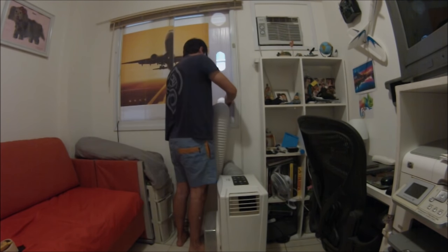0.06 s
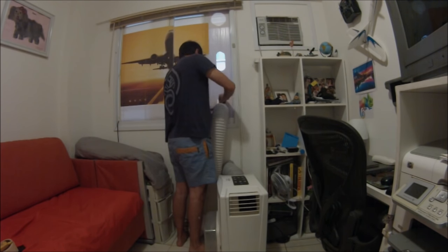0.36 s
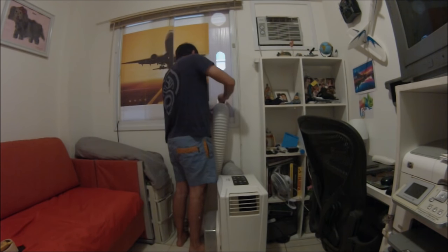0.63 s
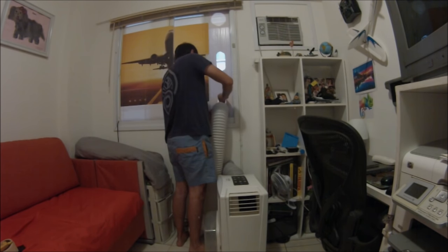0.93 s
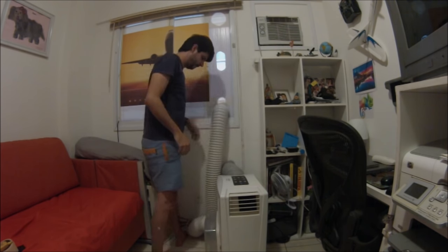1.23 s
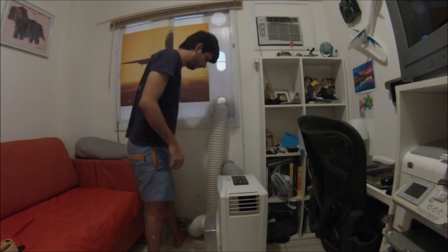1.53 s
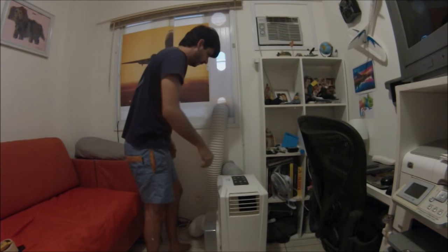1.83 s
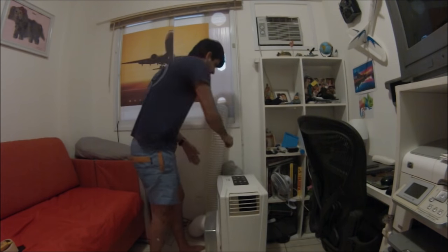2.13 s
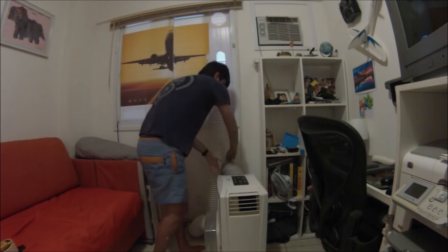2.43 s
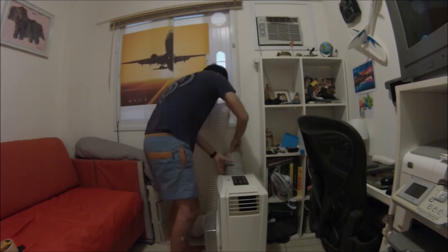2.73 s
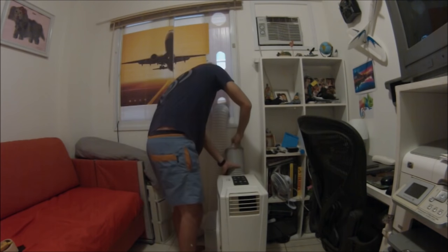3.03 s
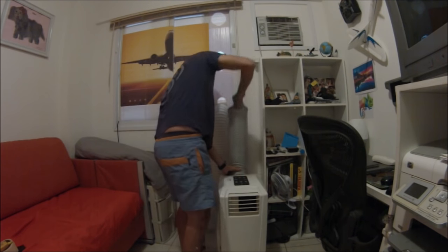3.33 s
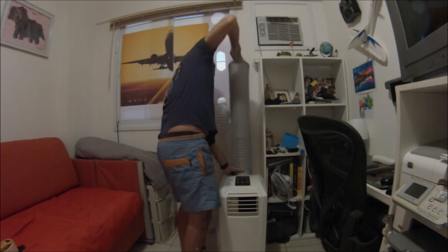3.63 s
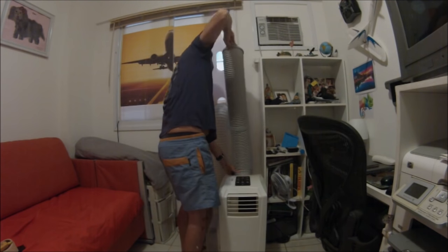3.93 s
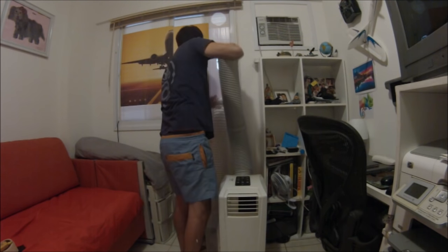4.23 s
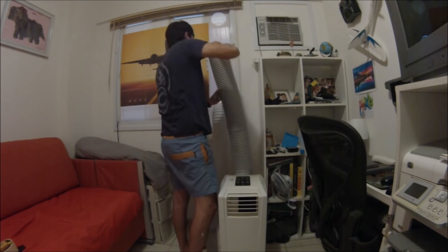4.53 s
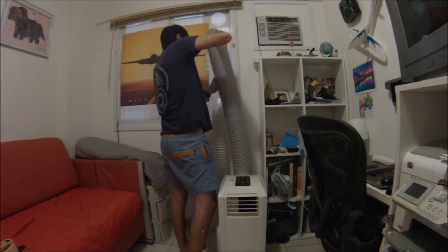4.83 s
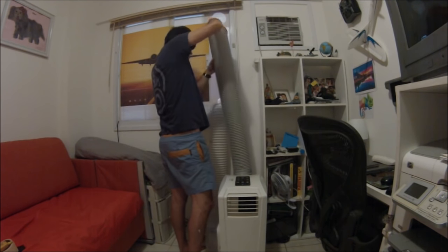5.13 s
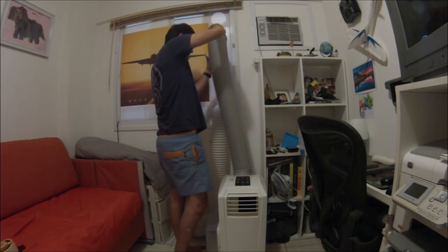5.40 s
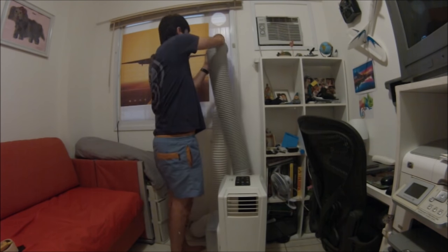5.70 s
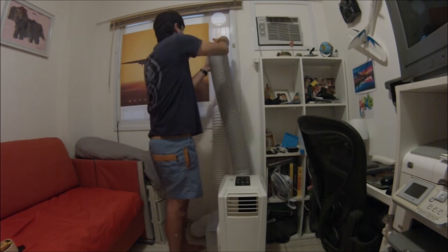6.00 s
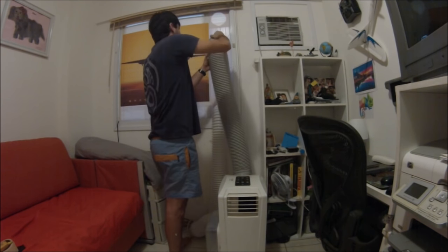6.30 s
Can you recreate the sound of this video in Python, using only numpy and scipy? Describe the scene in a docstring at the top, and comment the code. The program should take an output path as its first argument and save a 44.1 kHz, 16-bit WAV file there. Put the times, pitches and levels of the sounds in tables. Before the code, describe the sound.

A ribbed plastic air duct is handled in a small, boomy room, heard from a few metres away over a steady low hush. During the first second, fingers faintly rub the ribs and the hard collar knocks lightly as it comes off a window panel. Little but the hush follows until about 2.5 seconds, when the duct is squeezed together, crinkling and flexing on one hollow note. From 3.1 to 3.9 seconds comes the loudest part: the duct is stretched, its pleats buckling in dense snaps with sharp pops that grow deeper, until the last ribs go taut. Faint rubbing follows around 4.3 seconds. From 4.6 seconds the collar knocks and scrapes on the panel, with a firmer knock at 5.1. More knocks lead to a short, loud shove at 5.6 and a couple of thumps. Faint finger rubs close it around 6 to 6.4 seconds.

```python
"""Fingers rub a ribbed plastic air duct, and its hard collar knocks as it comes off a window panel.
The duct is gathered up, flexing on one hollow note, then stretched: its pleats buckle in dense
runs of snaps with a few loud pops, until the last ribs go taut. The collar then knocks and scrapes
on the panel and is shoved home. Throughout, a small, boomy room answers every sound, heard from
a few metres away over a steady hush."""
import sys
import numpy as np
from scipy import signal
from scipy.fft import rfft, irfft
from scipy.io import wavfile
from scipy.ndimage import uniform_filter1d

SR = 44100
rng = np.random.default_rng(int(sys.argv[2]) if len(sys.argv) > 2 else 0)


def put_to_file(sound):
    """Save the sound as 16-bit audio at rate SR, in the file named by the first command-line argument."""
    columns = np.atleast_2d(sound).T  # one column per channel
    safe = np.clip(columns, -1, 1)
    whole_steps = np.round(safe * 32767)
    wavfile.write(sys.argv[1], SR, whole_steps.astype(np.int16))


N = 284886
BINS_HZ = np.fft.rfftfreq(4096, 1 / SR)


def amp(db):
    """Decibels to amplitude ratio."""
    return 10 ** (np.asarray(db) / 20)


def unit(x):
    """Normalisation to energy 1."""
    return x / np.sqrt(np.sum(x ** 2) + 1e-20)


def read(points, hz):
    """Interpolation on a logarithmic frequency axis."""
    f, value = np.transpose(points)
    return np.interp(np.log(hz + 1), np.log(f + 1), value)


def add(mix, start_s, sound):
    """Superposition: a sound adds to the mix from its start."""
    part = mix[max(round(start_s * SR), 0):][:len(sound)]
    part += sound[:len(part)]


def click(spectrum_db):
    """Minimum phase: the sharpest causal pulse with this spectrum, energy 1."""
    log_gain = np.log(amp(np.maximum(spectrum_db, spectrum_db.max() - 100)))
    mirrored = np.r_[log_gain, log_gain[-2:0:-1]]
    response = np.exp(np.conj(signal.hilbert(mirrored)))
    return unit(irfft(response[:len(log_gain)]))


def whiten(x, width_hz):
    """Inverse filtering evens out a burst's broad spectrum and keeps its fine ripple, energy 1."""
    power = abs(rfft(x, 2 ** 16)) ** 2
    hz = np.fft.rfftfreq(2 ** 16, 1 / SR)
    smooth = uniform_filter1d(power, max(int(width_hz / hz[1]), 1))
    inverse = click(-10 * np.log10(np.interp(BINS_HZ, hz, abs(smooth)) + 1e-9))
    return unit(signal.oaconvolve(x, inverse)[:len(x)])


def snaps(count, per_s, spread_db):
    """A Poisson train of tiny buckles of uneven size, mean power 1."""
    size = amp(spread_db * np.clip(rng.standard_normal(count), -2, 2))
    sign = rng.choice([-1, 1], count)
    occurs = rng.random(count) < per_s / SR
    return unit(size * sign * occurs) * np.sqrt(count)


def clumps(t, per_s, depth_db):
    """Random amplitude modulation: ribs stick and give in small groups."""
    knots = np.arange(t[0], t[-1] + 1, 1 / per_s)
    gain = amp(depth_db * np.interp(t, knots, rng.uniform(-0.89, 1, len(knots))))
    return unit(gain) * np.sqrt(len(t))


def stroke(rows, spectrum, attack_s, release_s, swell_db_per_s, per_s, spread_db):
    """Impulse excitation: as ribs slip and buckle, each snap shakes the body and cracks in the film."""
    split_hz, depth_db = 2000, 26
    treble_ratio = (BINS_HZ / split_hz) ** 4 + 1e-12
    spectrum_db = read(spectrum, BINS_HZ)
    body_snap = click(spectrum_db - 10 * np.log10(1 + treble_ratio))
    film_snap = click(spectrum_db - 10 * np.log10(1 + 1 / treble_ratio))
    out = np.zeros(N)
    for start, length, body_db, film_db in rows:
        t = np.arange(0, length + release_s, 1 / SR)
        slack = np.maximum(1 - t / attack_s, 0) + np.maximum(t - length, 0) / release_s
        grip = amp(-depth_db * slack)
        train = snaps(len(t), per_s, spread_db) * clumps(t, per_s=69.5, depth_db=5) * grip
        add(out, start, signal.oaconvolve(train * amp(body_db + swell_db_per_s * t), body_snap))
        add(out, start, signal.oaconvolve(train * amp(film_db), film_snap))
    return out


def blows(rows, spectrum, bass_hz, treble_hz, ring_octaves, crack, crack_s, per_s):
    """Resonance: a chatter of ribs rings in the hollow of the duct; quick blows open with a crack."""
    out, hz, t = np.zeros(N), BINS_HZ + 1, np.arange(SR // 10) / SR
    for start, db, bass_db, treble_db, ring_hz, ring_db, scatter_s in rows:
        age = t / scatter_s
        drive = unit(snaps(len(t), per_s, spread_db=1) * np.sqrt(age) * np.exp(-age))
        drive[0] += crack * np.exp(-scatter_s / crack_s)
        shape_db = read(spectrum, hz) + bass_db / (1 + (hz / bass_hz) ** 4)
        shape_db += treble_db / (1 + (treble_hz / hz) ** 2)
        shape_db += ring_db * np.exp(-.5 * (np.log2(hz / ring_hz) / ring_octaves) ** 2)
        blow = unit(signal.oaconvolve(whiten(drive, width_hz=284), click(shape_db)))
        add(out, start, amp(db) * np.sqrt(SR / 50) * blow)  # level counts over 1/50 s
    return out


# The room's background. Each row: frequency in Hz, relative level in dB.
HUSH_SPECTRUM = [(12, -39.5), (20, -3.5), (49, -3), (119, -1), (171, -6.5), (238, -3), (352, -6),
                 (382, -8.5), (439, -6), (478, -7.5), (686, -9), (906, -12.5), (1160, -13.5), (2840, -18.5),
                 (15500, -39)]

def hush(level_db=-56):
    """Stationary noise, strongest in the bass, fills the room."""
    gain = amp(read(HUSH_SPECTRUM, np.fft.rfftfreq(N, 1 / SR)))
    noise = irfft(rfft(rng.standard_normal(N)) * gain, N)
    return amp(level_db) * unit(noise) * np.sqrt(N)


# Finger strokes. Each row: start and length in seconds, body and film levels in dB.
RUB_STROKES = [(0, 0.0121, -40.5, -46.5), (.09, 0.053, -52, -51.5), (.15, 0.048, -52, -56.5),
               (.66, 0.15, -52.5, -58), (.755, .05, -44, -44), (.8, 0.055, -38.5, -46),
               (1.42, 0.0336, -53.5, -60), (2.85, 0.203, -62, -59), (4.26, 0.319, -54, -58),
               (4.4, 0.04, -45, -47), (5.88, .27, -58, -60.5), (6.32, 0.13, -55.5, -57)]
# Their spectrum. Each row: frequency in Hz, relative level in dB.
RUB_SPECTRUM = [(30, -9), (60, -3), (110, -13), (200, -7), (350, -6), (800, -12.5), (1600, -9), (4000, -23),
                (7000, -34.5), (15500, -60)]

def rubbing():
    """Light friction: fingers slip over the ribs."""
    return stroke(RUB_STROKES, RUB_SPECTRUM, attack_s=0.01476, release_s=0.089,
                  swell_db_per_s=2.5, per_s=1100, spread_db=1.5)


# Collar impacts. Each row: start in seconds, level, bass and treble in dB, ring in Hz,
# scatter time in seconds.
COLLAR_KNOCKS = [(.1, -49.5, -17, -10, 2200, .006), (.224, -43.5, -5, -15, 573, 0.0034),
                 (.759, -41, -9, -13, 500, 0.0045), (.816, -34, -12, -19, 420, 0.0068),
                 (4.64, -33, 6, 0, 306, 0.0036), (4.653, -39, 2, -9, 575, 0.0047),
                 (4.731, -34.5, 6.5, -8.5, 293, 0.0035), (5.089, -24, 12.5, -4, 1490, 0.0063),
                 (5.425, -34.5, 10.5, 3.5, 442, 0.0023), (5.482, -34, -4, -3.5, 4400, .004),
                 (5.633, -27.5, 4, 12, 1226, 0.0033), (5.692, -24.5, 9, -6, 168, 0.0022),
                 (5.82, -32, 17, 7, 200, 0.00447)]
# Their spectrum. Each row: frequency in Hz, relative level in dB.
KNOCK_SPECTRUM = [(35, -33), (90, -9), (300, -4), (700, -6.5), (1500, -10.5), (3500, -14.5), (7000, -20),
                  (11000, -27), (15500, -38)]

def knocking(ring_db=8):
    """Impact: the hard collar strikes the panel, ringing differently at each place."""
    rows = [(*knock, ring_db, scatter_s) for *knock, scatter_s in COLLAR_KNOCKS]
    return blows(rows, KNOCK_SPECTRUM, bass_hz=190, treble_hz=2500, ring_octaves=0.4,
                 crack=2.1, crack_s=0.00067, per_s=5000)


# The squeeze. Each row: start and length in seconds, body and film levels in dB.
GATHER_STROKES = [(2.555, 0.24, -30, -36)]
# Its spectrum. Each row: frequency in Hz, relative level in dB.
GATHER_SPECTRUM = [(24, -70.5), (40, -30.5), (129, -2.5), (162, -6), (325, 3.5), (438, -5.5), (509, 0.5),
                   (621, -22), (670, -8.5), (1220, -5.5), (3140, -17.5), (8730, -34), (15500, -43.5)]

def gathering():
    """Compression: the ribs buckle as they are pushed together."""
    return stroke(GATHER_STROKES, GATHER_SPECTRUM, attack_s=0.14, release_s=0.19,
                  swell_db_per_s=-7.5, per_s=820, spread_db=2.5)


# Flexes of the bunched duct. Each row: start in seconds, level and treble in dB.
DUCT_FLEXES = [(2.631, -40, -6.5), (2.684, -30.5, -9), (2.750, -29, -13.5), (2.784, -33, 3.5),
               (3.047, -26.5, -10.5), (3.073, -29, -15.5), (3.102, -22.5, -16)]
# Pleats flipping. Each row: start in seconds, level and treble in dB, ring in Hz,
# scatter time in seconds.
PLEAT_POPS = [(3.121, -20, 4.5, 990, 0.00135), (3.161, -14.5, 10, 3850, 0.0012),
              (3.169, -14.5, 1, 840, .0036), (3.232, -14, -6, 3270, 0.0033),
              (3.235, -12.5, -5, 296.3, 0.0045), (3.294, -17, -37, 246, 0.0045),
              (3.311, -15.5, 5.5, 1030, 0.00376), (3.374, -14, -8.5, 1430, 0.00486),
              (3.391, -16, -18, 240, .0056), (3.442, -18, -1.5, 555, .003),
              (3.478, -17.5, -8.5, 60, 0.0101), (3.522, -16.5, -10.5, 880, 0.0074),
              (3.553, -15.5, -26, 540, 0.0055), (3.755, -20.5, -16, 1594, 0.007)]
# The spectrum of both. Each row: frequency in Hz, relative level in dB.
PLEAT_SPECTRUM = [(35, -16), (90, -5.5), (250, 3), (600, -2), (1300, -3), (2600, -5.5), (5000, -8),
                  (9000, -12.5), (12000, -22), (15500, -29)]

def pleats(hollow_hz=332, hollow_db=12.5, flex_bass_db=2, flex_scatter_s=0.005, pop_ring_db=8):
    """Snap-through buckling: the bunched duct flexes on one note; drawn out, it pops ever deeper."""
    rows = [(start, db, flex_bass_db, treble_db, hollow_hz, hollow_db, flex_scatter_s)
            for start, db, treble_db in DUCT_FLEXES]
    for start, db, treble_db, ring_hz, scatter_s in PLEAT_POPS:
        drawn_s = start - PLEAT_POPS[0][0]
        bass_db = -10.5 + 31 * drawn_s
        rows.append((start, db, bass_db, treble_db, ring_hz, pop_ring_db, scatter_s))
    return blows(rows, PLEAT_SPECTRUM, bass_hz=178, treble_hz=2570, ring_octaves=0.21,
                 crack=2.2, crack_s=0.001058, per_s=5500)


# A hard pull, then an easier one. Each row: start and length in seconds, body and film levels in dB.
STRETCH_STROKES = [(3.115, 0.4894, -18.5, -18), (3.59, 0.18, -19.5, -21.5)]
# Their spectrum. Each row: frequency in Hz, relative level in dB.
STRETCH_SPECTRUM = [(30, -39.5), (60, -3), (105, -7.5), (140, -0.5), (250, -3), (400, -1), (590, -3),
                    (700, -7.5), (1200, -2.5), (2000, 5), (3500, -11.5), (7000, -20), (11000, -27),
                    (15500, -30.5)]

def stretching(stick_db=4, stick_s=0.025):
    """Stick-slip: the run of snaps dips as tension builds towards each pop, then runs free."""
    t = np.arange(N) / SR
    catches = [(t < pop_s) * np.exp(-abs(pop_s - t) / stick_s) for pop_s, *_ in PLEAT_POPS]
    tension = np.max(catches, axis=0)
    pull = stroke(STRETCH_STROKES, STRETCH_SPECTRUM, attack_s=0.018, release_s=0.052,
                  swell_db_per_s=8, per_s=700, spread_db=3.5)
    return amp(-stick_db * tension) * pull


# The end of the pull. Each row: start and length in seconds, body and film levels in dB.
TAUT_STROKES = [(3.74, 0.11056, -17, -20)]
# Its spectrum. Each row: frequency in Hz, relative level in dB.
TAUT_SPECTRUM = [(40, -18), (92, -5), (140, -1), (200, -18), (290, -4.5), (400, -12.5), (850, -10.5),
                 (1250, -1), (1850, -1), (2350, -1.5), (3800, -8), (9000, -19), (15500, -32)]

def going_taut():
    """Tension snaps the last ribs open."""
    return stroke(TAUT_STROKES, TAUT_SPECTRUM, attack_s=0.0205, release_s=0.036,
                  swell_db_per_s=0, per_s=650, spread_db=3)


# A light scrape, then a firm one. Each row: start and length in seconds, body and film levels in dB.
SCRAPE_STROKES = [(4.76, 0.15, -37.5, -43.5), (4.89, 0.216, -29.5, -36)]
# Their spectrum. Each row: frequency in Hz, relative level in dB.
SCRAPE_SPECTRUM = [(24, -54.5), (40, -16), (91, 2), (126, 1), (247, 0.5), (484, -7.5), (686, -13),
                   (758, -10.5), (1160, -14), (1280, -8.5), (2060, -7.5), (6640, -28.5), (15500, -43.5)]

def scraping():
    """Sliding friction: the collar drags along the panel in rapid slips."""
    return stroke(SCRAPE_STROKES, SCRAPE_SPECTRUM, attack_s=0.025, release_s=0.06,
                  swell_db_per_s=5, per_s=2100, spread_db=3)


# The push home. Each row: start and length in seconds, body and film levels in dB.
SHOVE_STROKES = [(5.629, 0.056, -19, -20)]
# Its spectrum. Each row: frequency in Hz, relative level in dB.
SHOVE_SPECTRUM = [(40, -47), (90, -6.5), (140, 0.5), (200, -17), (270, -4), (430, -5.5), (600, 0.5),
                  (880, -18), (1250, 1.5), (2000, 4.5), (3500, -10), (7000, -14), (15500, -35)]

def shoving():
    """A friction transient: the duct slides home in one dense burst of slips."""
    return stroke(SHOVE_STROKES, SHOVE_SPECTRUM, attack_s=0.0058, release_s=0.025,
                  swell_db_per_s=-14.5, per_s=2500, spread_db=3)


# Reverberation times. Each row: frequency in Hz, time to fall 60 dB in seconds.
DECAY_TIMES = [(150, 0.407), (700, 0.25), (1800, 0.2776), (5000, 0.29), (9000, 0.276), (15000, 0.21)]

def reflections(t, diffuse_hz=158, build_s=0.00074, walls_s=0.015, walls_db=6.5):
    """Reverberation: early echoes from near walls thicken into a tail whose bass lasts longest."""
    cluster = amp(walls_db * np.exp(-(t / walls_s - 1) ** 2))
    echoes = rng.standard_normal(len(t)) * (rng.random(len(t)) < .1 + 10 * t)
    onset = 1 - np.exp(-t / build_s)
    hz, when, spectra = signal.stft(echoes * onset * cluster, SR, nperseg=256)
    decay = amp(-60 * when / read(DECAY_TIMES, hz)[:, None])
    tail = signal.istft(spectra * decay, SR)[1][:len(t)]
    highpass = signal.butter(2, diffuse_hz, "high", fs=SR, output="sos")
    return signal.sosfilt(highpass, whiten(tail, width_hz=140))


# Room modes. Each row: frequency in Hz, relative energy in dB, time to fall 60 dB in seconds.
STANDING_WAVES = [(60.6, -31.5, 0.93), (92.51, -22, 0.42), (137.2, -25.5, 0.52), (176.3, -41.5, 0.4),
                  (244.2, -31.5, 0.32), (281.3, -43, 0.29), (353, -27.5, 0.24), (500, -34.5, 0.78),
                  (604, -24.5, 0.24)]

def room(x, direct_db, modes_db, places_per_s, places=5):
    """Superposition of direct sound, standing waves and reflections that vary along the duct."""
    t = np.arange(SR // 2) / SR
    standing = sum(amp(db + modes_db) * unit(np.cos(2 * np.pi * hz * t) * amp(-60 * t / t60))
                   for hz, db, t60 in STANDING_WAVES)
    out = amp(direct_db) * x + signal.oaconvolve(x, standing)[:N]
    place = places_per_s * np.arange(N) / SR  # the buckling wanders along the ribs
    for k in range(places):
        share = np.maximum(1 - abs((place + k) % places - places / 2), 0)
        out += signal.oaconvolve(x * np.sqrt(share), reflections(t))[:N]
    return out / np.sqrt(1 + amp(direct_db) ** 2)


def scene():
    """Linear mixing: all the duct's sounds excite one room, over its hush."""
    duct = rubbing() + knocking() + gathering() + pleats()
    duct += stretching() + going_taut() + scraping() + shoving()
    return (room(duct, direct_db=-2, modes_db=-3.5, places_per_s=60) + hush())[None]


def record(dry, ceiling=0.85, edge_hz=15550):
    """Soft saturation rounds the loudest cracks; a low-pass filter then limits the band."""
    rounded = dry / (1 + (dry / ceiling) ** 4) ** (1 / 4)
    lowpass = signal.firwin(511, edge_hz, window=("kaiser", 8), fs=SR)
    return signal.oaconvolve(rounded, lowpass[None], "same")


dry = scene()
out = record(dry)
put_to_file(out)
```